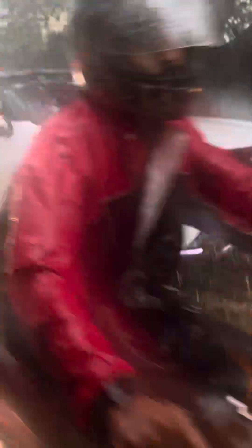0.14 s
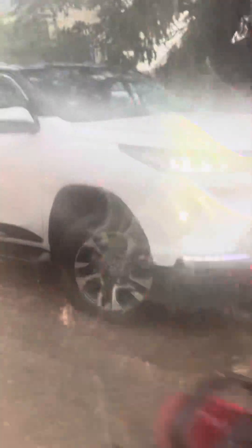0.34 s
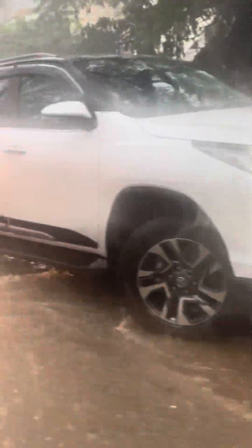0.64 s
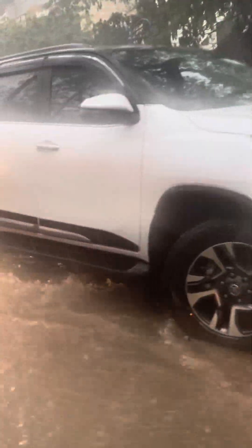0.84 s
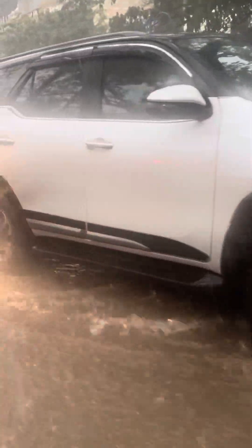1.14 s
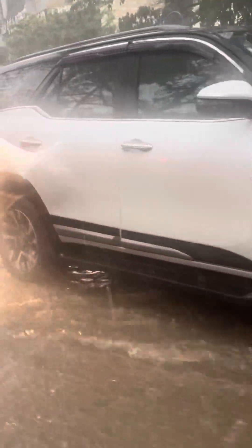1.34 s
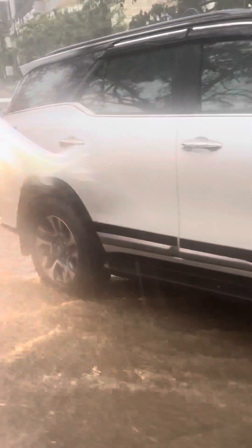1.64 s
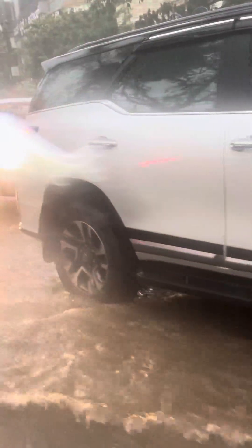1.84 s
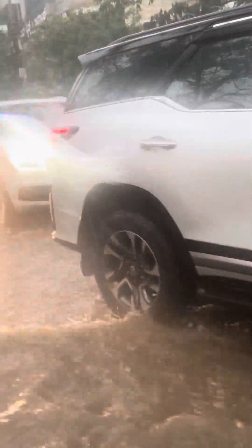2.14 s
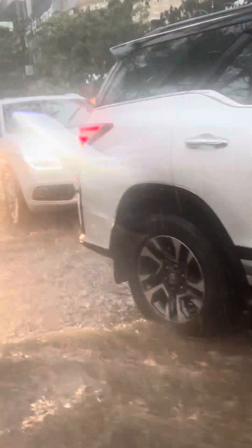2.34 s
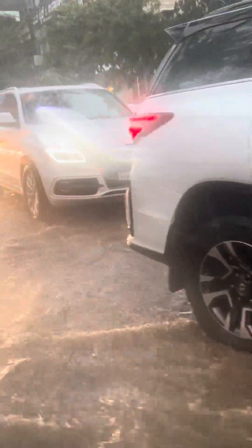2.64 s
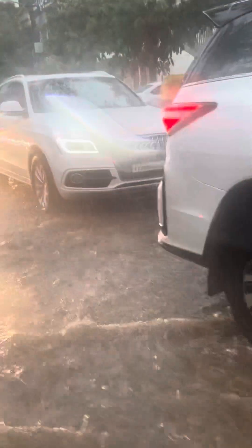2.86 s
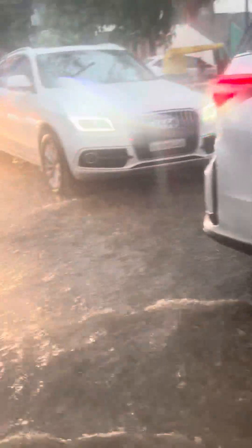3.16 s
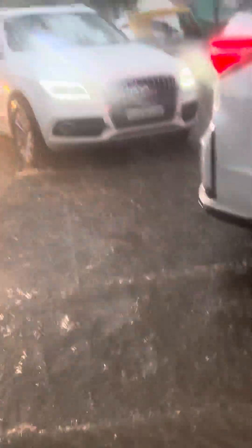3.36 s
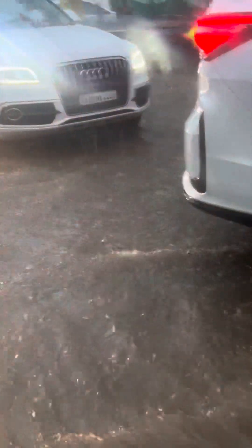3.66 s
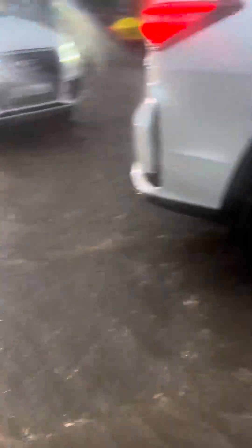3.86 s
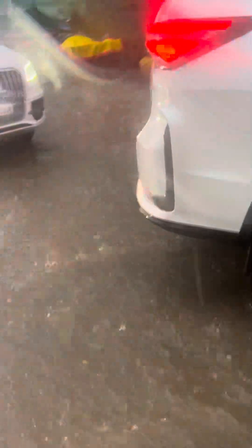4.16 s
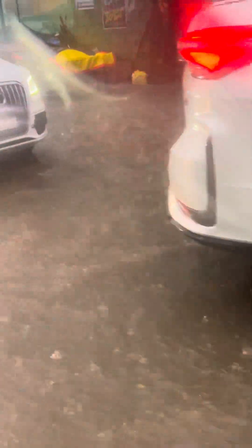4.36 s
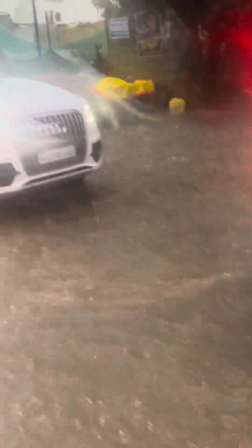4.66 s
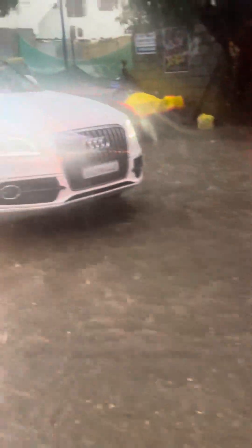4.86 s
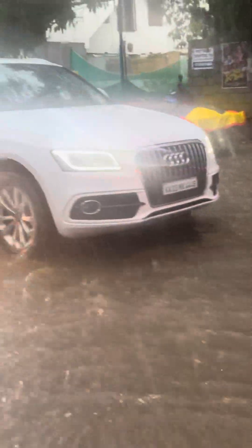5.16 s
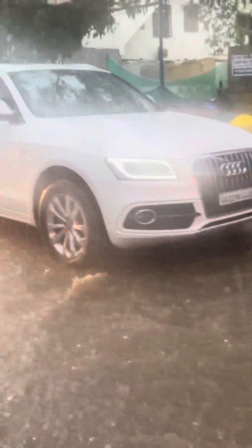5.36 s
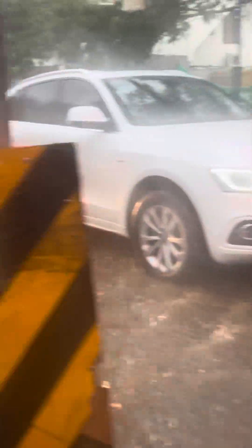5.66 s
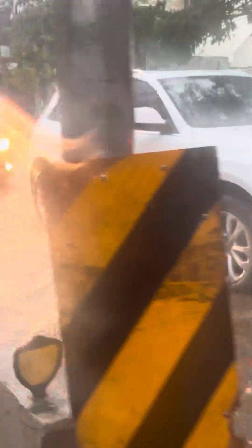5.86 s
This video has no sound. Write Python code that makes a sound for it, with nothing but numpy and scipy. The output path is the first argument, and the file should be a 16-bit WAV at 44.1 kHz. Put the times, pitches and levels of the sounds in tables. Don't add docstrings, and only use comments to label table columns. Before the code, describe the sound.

Heavy rain on a flooded street heard from inside a slow vehicle, engine throbbing, drops cracking on panels, a near horn blaring late.

```python
import sys
import numpy as np
from scipy import signal
from scipy.fft import irfft
from scipy.io import wavfile
from scipy.ndimage import uniform_filter1d

SR = 44100
rng = np.random.default_rng(int(sys.argv[2]) if len(sys.argv) > 2 else 0)


def wav_record(signal):
    frames = np.transpose(np.atleast_2d(signal))
    bounded = np.clip(frames, -1, 1)
    quanta = np.round(bounded * 32767).astype(np.int16)
    wavfile.write(sys.argv[1], SR, quanta)


def convert_level_to_amplitude(level_db):
    exponent = np.asarray(level_db, float) / 20
    return 10 ** exponent


N = 264730
IDLE_HZ = 22.9
LEAD_IN_S = .003

# t/s, traffic nearness/dB, rain strength/dB
STREET = [(0.0, -4, 5), (.12, -6, 7), (.155, -5, 11), (.19, -5, 6), (.43, -2.5, 5.5), (.55, 2.5, 6.5),
          (.72, 4, 5.5), (1.14, 0, 2.5), (1.5, 0, 2), (1.9, 0, 1), (2.6, .5, 0.5), (3.1, 0, 0),
          (3.5, -1.5, 0), (4.2, 0, 0), (4.6, 2, 3), (5.1, 1.5, 4), (5.5, 1.5, 2.5), (6.0, 1, 2)]


def evened(x):
    return x / np.sqrt(np.mean(x ** 2) + 1e-20)


def read(points, hz):
    f, value = np.transpose(points)
    return np.interp(np.log(hz + 1), np.log(f + 1), value)


def columns(rows, t):
    s, *rest = np.transpose(rows)
    return [np.interp(t, s, c) for c in rest]


def add(mix, s, sound):
    part = mix[:, round(s * SR):][:, :sound.shape[1]]
    part += sound[:, :part.shape[1]]


def wander(size, hz):
    rate, turn = rng.uniform(-1, 1, (2, 12, 1))
    t = np.arange(0, size + 128, 64) / SR
    coarse = np.exp(2j * np.pi * (rate * hz * t + turn)).sum(0) / np.sqrt(12)
    return np.interp(np.arange(size) / 64, np.arange(len(coarse)), coarse)


def ports(hz):
    # f/Hz, left-right/dB
    lean = [(60, -1.5), (96, 3), (150, -1), (250, 5), (400, 4), (640, 10), (1020, 3.5), (1630, 0),
            (2620, 0.5), (4200, -0.5)]
    # f/Hz, left lead/rad
    lead = [(60, .03), (200, 0.29), (600, 1.7), (900, 5), (1800, 6.3), (2400, 9.16), (3400, 6.6),
            (4400, 8.36), (8000, 7.44)]
    left = convert_level_to_amplitude(read(lean, hz) / 2) * np.exp(1j * read(lead, hz))
    return np.array([left, 1 / abs(left)])


def street():
    # f/Hz, density/dB
    rumble = [(15, -31.5), (25, -6), (49, 0), (81, -5), (120, -3.5), (173, -15), (313, -12), (399, -25.5),
              (450, -26), (580, -51.5), (990, -120)]
    water = [(210, -34), (350, -7.5), (584, -4), (632, 0.5), (680, -2.5), (821, -1), (883, 2), (960, 4),
             (1060, -1.5), (1340, -8), (1500, -6.5), (1950, -38.5), (3300, -120)]
    patter = [(790, -44.5), (1350, -3), (1460, -12), (1790, -4.5), (2030, -10.5), (2500, -15.5),
              (2800, -21.5), (3640, -60), (6160, -120)]
    fizz = [(1500, -37), (2500, -5), (3100, -0.5), (3900, -4), (4700, -7.5), (5150, -16), (5330, -32),
            (5750, -30), (6000, -18), (8000, -21.5), (8500, -28.5), (9600, -31), (9850, -70.5),
            (14000, -88)]
    # f/Hz, density/dB
    air = [(10800, -40.5), (11100, -2), (13000, -0.5), (13300, -12)]
    # from/s, to/s
    air_off_s = (.63, 1.74)
    # f/Hz, left-right likeness/1
    likeness = [(60, 1), (110, 0.9), (200, 0.68), (370, 0.63), (680, 0.089), (1250, 0.18), (2300, 0.69),
                (4200, 0.43), (7000, 1), (9000, 0.54)]
    # level/dB, traffic share/1, rain share/1
    beds = [
        (-33.5, 0.92, -0.088),
        (-38, 0.88, 0.045),
        (-55, -0.079, 1.15),
        (-68, 0.11, 1.04),
    ]

    frames, hz = N // 128 + 5, np.fft.rfftfreq(512, 1 / SR)
    t = np.arange(frames) * 128 / SR
    a, b, c, d, patches = rng.standard_normal((frames, 257, 5)).T
    patches = evened(uniform_filter1d(uniform_filter1d(patches, size=7, axis=0), size=16, axis=1))
    flicker = evened(uniform_filter1d(rng.standard_normal((frames, 257)).T, size=60, axis=0))

    power = 0
    traffic_db, rain_db = columns(STREET, t)
    shapes, widths_db = (rumble, water, patter, fizz), (2.6, 4.88, 7.35, 8.5)
    for shape, width_db, (db, cars, wet) in zip(shapes, widths_db, beds):
        level_db = db + cars * traffic_db + wet * rain_db
        gain = convert_level_to_amplitude(read(shape, hz))
        power = power + (gain[:, None] / np.linalg.norm(gain) * convert_level_to_amplitude(level_db + width_db)) ** 2
    hushed = (t > air_off_s[0]) & (t < air_off_s[1])
    power = power + convert_level_to_amplitude(read(air, hz)[:, None] - 104 - 40 * hushed) ** 2

    same = np.clip(read(likeness, hz), -1, 1)[:, None]
    left = a + 1j * b
    z = np.array([left, same * left + np.sqrt(1 - same ** 2) * (c + 1j * d)])
    z *= ports(hz)[:, :, None] * np.sqrt(power) * convert_level_to_amplitude(1.35 * patches + 1.43 * flicker + 1.5)
    return signal.istft(z, nperseg=512, noverlap=384)[1][:, :N]


def bending(treble_db, spread_s, size=2048):
    # f/Hz, density/dB
    panel = [(120, -39.5), (280, -2), (420, -0.5), (900, -0.5), (1480, -1.5), (1980, -8.5), (2800, -25),
             (4200, -47), (5500, -68), (7000, -64), (9200, -71.5), (10500, -85.5), (16000, -96)]
    # f/Hz, left lead/rad
    panel_lead = [(900, .05), (1400, 0.53), (2100, 1.82), (3200, 2), (5000, .3)]
    hz = np.fft.rfftfreq(size, 1 / SR)
    gain = convert_level_to_amplitude(read(panel, hz) + treble_db * np.clip(np.log2(hz / 1500 + 1e-9), 0, 1))
    pair = np.exp(.5j * read(panel_lead, hz) * np.array([[1], [-1]]))
    travel_rad = 4 * np.pi * spread_s * np.sqrt(1000 * hz) + 2 * np.pi * hz * LEAD_IN_S
    pulse = irfft(gain * pair * np.exp(-1j * travel_rad - 2.8j))
    pulse = pulse * signal.windows.tukey(size, .06)
    return pulse / abs(pulse).max()


def drops():
    lands = rng.random(N) < 400.0 / SR
    size = convert_level_to_amplitude(3.1 * np.minimum(rng.exponential(1, N), 4)) * lands
    patch, out = rng.integers(0, 6, N), np.zeros((2, N))
    for k in range(6):
        side = convert_level_to_amplitude([[3.0], [-3.0]]) ** (-1) ** k
        tick = bending(2.7 + 2.5 * (k // 2), rng.uniform(.0008, 0.002996)) * side
        out += signal.oaconvolve((size * (patch == k))[None], tick, axes=1)[:, :N]
    rain_db = columns(STREET, np.arange(N) / SR)[1]
    return convert_level_to_amplitude(rain_db - 49.5) * evened(out)


def throb(turns, orders):
    out = np.zeros((2, N))
    for k, db in orders:
        lag_rad = .9 * k ** 2
        tone = convert_level_to_amplitude(db) * np.exp(2j * np.pi * k * turns + 1j * lag_rad) * (1 + 0.42 * wander(N, 5.0))
        out += np.sqrt(2) * (ports(k * IDLE_HZ)[:, None] * tone).real
    return out


def neighbour_engine():
    # t/s, level/dB
    nearness = [
        (.6, -61),
        (.9, -44),
        (1.4, -39),
        (1.9, -38),
        (2.1, -34.5),
        (2.4, -31.5),
        (2.55, -66),
    ]
    # order/1, level/dB
    idle_orders = [(2, 1), (3, 5), (5, -4), (6, -13.5)]
    t = np.arange(N) / SR
    level_db = columns(nearness, t)[0]
    return throb(IDLE_HZ * t, [(k, level_db + db) for k, db in idle_orders])


def own_engine():
    # t/s, firing rate f/Hz, load/dB, strain/dB per order
    course = [(0.0, 17.6, -20, 4), (.25, 17.7, 2, 5.5), (.6, 14.9, -9, 2.5), (.95, 17.6, 0.5, 9.5),
              (1.25, 18.9, -8.5, 6.5), (1.7, 20.5, -3, 7), (2.2, 22.6, 2, 2), (2.55, 23.4, -2, 4),
              (2.72, 23.4, -3, 3), (2.79, 23.3, 5, -4.5), (3.2, 20.8, -0.5, -2.5), (3.6, 20.9, -1, 1.5),
              (4.0, 21.4, -2, -1.5), (4.4, 22.6, -1, -2.5), (5.0, 24.3, -1, 0.5), (5.4, 25.7, -5, -4.5),
              (5.7, 24.4, -4, -2), (6.0, 23, 4.5, -1.5)]
    # order/1, level at middle load/dB
    low_orders = [(2, -39), (3, -30), (4, -32.5), (5, -34)]
    # f/Hz, level/dB
    boom = [(80, -27.5), (100, -31), (115, -40.5), (140, -49), (190, -49), (232, -43.5), (260, -51)]
    hz, load_db, strain_db = columns(course, np.arange(N) / SR)
    orders = [(k, db + load_db + strain_db * (k - 4)) for k, db in low_orders]
    orders += [(k, read(boom, k * hz) + 0.33 * load_db) for k in range(6, 11)]
    return throb(np.cumsum(hz) / SR, orders)


def thumps():
    # t/s, pitch f/Hz, peak level/dB, t60/s
    knocks = [
        (.545, 90, 2, 0.038),
        (0.911, 93, -7, 0.14),
        (.968, 109, -11, 0.073),
        (.998, 299, -16, 0.045),
        (1.005, 186, -8, 0.068),
        (2.887, 325.5, -18, .09),
        (4.79, 247, -16.5, 0.054),
        (5.476, 73.3, -0.5, 0.084),
    ]
    out, t = np.zeros((2, N)), np.arange(6000) / SR
    for s, hz, db, t60 in knocks:
        knock = convert_level_to_amplitude(db - 60 * t / t60) * np.sin(2 * np.pi * hz * t) * np.minimum(t * hz, 1)
        add(out, s, knock * np.ones((2, 1)))
    return out


def cracks():
    # t/s, peak level/dB, treble/dB, left-right/dB
    hits = [(0.109, -29, 14, -1), (0.16, -29, 14, 0.5), (0.2486, -21, 13.5, -1), (0.42, -33, 8, 6),
            (.588, -23, 9, 7), (.6858, -28, 8, 0), (0.7746, -28, 7, 0.5), (1.821, -27, 5, 6),
            (2.147, -33, 8, -1), (2.42, -33.5, 9, 3), (2.851, -26.5, 9, 0), (2.8824, -1.5, 7.5, -2.5),
            (3.0656, -32, 9, 0), (3.231, -32.5, 7.5, 1), (3.46, -30, 10, 4), (3.51, -29, 6.5, 0.5),
            (3.765, -28.5, 8, 0), (4.001, -21, -3, 2.5), (4.02, -26, 7, 0.5), (4.111, -28, 10.5, 2),
            (4.21, -29, 15.5, 2.5), (4.348, -26.5, 3, 4.5), (4.7885, -13.5, 10, -2), (5.3686, -30, 9, 0),
            (5.3813, -15.5, 13, -2), (5.4465, -26.5, 9, 2), (5.4685, -16, 8, -1.5), (5.628, -22.5, 1, 4),
            (5.7663, -31, 9, -1), (5.8155, -32.5, 8, 0)]
    out = np.zeros((2, N))
    for s, db, treble_db, pan_db in hits:
        blow = bending(treble_db, 0.002422)
        dull = uniform_filter1d(blow, size=45)
        blow = blow + 0.66 * np.roll(dull, 170, axis=1) - 0.58 * np.roll(dull, 420, axis=1)
        side_db = np.array([[pan_db / 2], [-pan_db / 2]])
        add(out, s - .0008 - LEAD_IN_S, convert_level_to_amplitude(db + side_db) * blow)
    return out


def ticks():
    # t/s, level/dB
    hits = [
        (2.8832, -46),
        (5.3827, -42.5),
        (5.469, -32.5),
        (5.4698, -37),
    ]
    # f/Hz, density/dB
    glass = [(1500, -30), (2600, -7), (4000, 0.5), (5000, -3), (5600, -15), (6500, -8), (8000, -9),
             (9500, -22), (10300, -45), (11300, -28), (13500, -40)]
    out, hz = np.zeros((2, N)), np.fft.rfftfreq(512, 1 / SR)
    snap = np.roll(irfft(convert_level_to_amplitude(read(glass, hz))), 256) * np.hanning(512)
    for s, db in hits:
        add(out, s - 256 / SR, convert_level_to_amplitude(db + np.array([[3.0], [-3.0]])) * snap / abs(snap).max())
    return out


def blast(start, attack, hold, db, swell_db, release_db):
    t = np.arange(0, attack + hold + 0.3, 1 / SR)
    after = np.maximum(t - attack - hold, 0)
    fall_db = np.minimum(release_db * after, 11.5 + 108.5 * after)
    return start + t, db - 9 * np.maximum(1 - t / attack, 0) + swell_db * t - fall_db


def horn(shape, orders, sides, hz, sag, drift_hz):
    t, level_db = blast(*shape)
    turns = np.cumsum(hz * (1 - sag * np.exp(-(t - t[0]) / .025))) / SR
    at_hz, lean_db, lead = np.transpose(sides)
    out = np.zeros((2, len(t)))
    for k, gain, scatter in orders(t, level_db):
        paths = np.array([1 + scatter * wander(len(t), drift_hz * np.sqrt(k)) for port in range(2)])
        left = convert_level_to_amplitude(np.interp(k * hz, at_hz, lean_db)) * np.exp(1j * np.interp(k * hz, at_hz, lead))
        pair = np.array([[left], [1]]) * 2 / abs(left + 1)
        tone = gain * np.exp(2j * np.pi * (k * turns + rng.random())) * paths / np.sqrt(1 + scatter ** 2)
        out += np.sqrt(2) * (pair * tone).real
    return t[0], out * signal.windows.tukey(len(t), .02)


def far_orders(t, level_db):
    # order/1, level against the ring/dB
    plain_orders = [(1, 4), (2, 1), (10, -20.5), (14, -41), (19, -44), (20, -24), (21, -46), (22, -45)]
    # order/1, level/dB
    ring_orders = [(6, -11.5), (7, 1.5), (8, .5), (9, -16.5)]
    # order/1, t/s, level/dB
    shade = np.array([(6, .62, 4), (6, .76, 4.5), (6, 0.93, 2), (6, 0.99, -7), (6, 1.12, -3), (6, 1.22, 2),
                      (6, 1.31, 4), (6, 1.2, -4), (6, 1.46, 1), (6, 1.56, -8), (6, 1.62, 1.5),
                      (7, 0.52, -6), (7, 0.63, -4.5), (7, 0.88, -3), (7, 0.93, 4.5), (7, 0.98, -2),
                      (7, 1.1, 1.5), (7, 1.34, -2), (7, 1.44, 3), (7, 1.55, 1), (7, 1.63, -3), (8, .62, 4),
                      (8, 0.88, 0), (8, .94, -2), (8, 1.12, 2), (8, 1.11, -4.5), (8, 1.26, 2.5),
                      (8, 1.32, -4), (8, 1.45, 0), (8, 1.54, -7), (8, 1.61, 2.5), (9, .62, 5), (9, .94, 3),
                      (9, 0.91, -6), (9, 1.1, 3), (9, 1.34, -2), (9, 1.5, 1), (9, 1.8, 0)])
    # t/s, width/s, rise/dB per order above 7
    s, width, accent_db = (1.62, 0.023, 4.2)
    push_db = accent_db * np.exp(-((t - s) / width) ** 2)
    levels = [(k, level_db + db - 0.9) for k, db in plain_orders]
    for k, db in ring_orders:
        brighten_db = 3.5 * (k - 7.5) * (t - t.mean())
        shade_db = np.interp(t, *shade[shade[:, 0] == k, 1:].T)
        levels.append((k, level_db + db + brighten_db + push_db * max(k - 7, 0) + shade_db))
    return [(k, convert_level_to_amplitude(db), 1.2) for k, db in levels]


def near_orders(t, level_db):
    # order/1, level/dB
    high_orders = [(10, -41), (11, -43.5), (12, -53.5), (13, -58), (14, -51), (15, -51.5), (16, -57.5),
                   (17, -54), (18, -60), (19, -65.5), (20, -66.5), (21, -72)]
    # order/1, t/s, echo share/1, level of the swell that follows/dB
    nulls = [(1, 4.4, 0, -3), (1, 4.72, .05, 0), (1, 5.05, 0.11, -1), (1, 6.2, .1, 0), (2, 4.46, .2, -3),
             (2, 4.61, 0.24, -1), (2, 4.73, 0, -9.5), (2, 4.792, 0.5, 6), (2, 4.92, 0, -6.5),
             (2, 4.975, 0.8, -13), (2, 5.022, 0.3, -2.5), (2, 5.093, 0, 5), (2, 5.25, 0.3, 8),
             (2, 5.33, .5, 11), (3, 4.47, 0.1, 0), (3, 4.65, 0.53, 1), (3, 4.76, 0.1, -2),
             (3, 4.872, 0.6, 2), (3, 5.015, 0.47, -4), (3, 5.125, .8, -7), (3, 5.25, .7, 2.5),
             (3, 5.33, .5, 1), (4, 4.54, .5, -14), (4, 4.65, 0.2, -13.5), (4, 4.75, .85, -16.5),
             (4, 4.84, 0.4, -6), (4, 4.95, 0.8, -12.5), (4, 5.022, 0.8, -12), (4, 5.145, .3, -8.5),
             (4, 5.25, 0.5, -9.5), (4, 5.33, .5, -10), (5, 4.47, 0.6, -18.5), (5, 4.69, .9, -26),
             (5, 4.75, .5, -16.5), (5, 4.85, .85, -25), (5, 4.95, .2, -23), (5, 5.022, 0.8, -17),
             (5, 5.125, .55, -18.5), (5, 5.23, .4, -16), (5, 5.33, .5, -13), (6, 4.5, .5, -29.5),
             (6, 4.68, .5, -34.5), (6, 4.84, .8, -26), (6, 5.05, .5, -26.5), (6, 5.15, .3, -33),
             (6, 5.3, .5, -33),
             (7, 4.48, .3, -31), (7, 4.7, .4, -25), (7, 4.84, .7, -32), (7, 4.93, .4, -33),
                  (7, 5.04, .8, -27), (7, 5.3, .5, -30), (8, 4.48, .3, -30), (8, 4.6, 0.5, -28),
                  (8, 5.02, 0.3, -32.5), (8, 5.09, 0.6, -31), (8, 5.7, .5, -34.5), (8, 5.3, .5, -35),
                  (9, 4.48, .3, -34), (9, 4.62, .3, -31), (9, 4.845, 0.5, -32.5), (9, 5.0, .2, -34.5),
                  (9, 5.15, .6, -39.5), (9, 5.3, .5, -40)]
    levels, rows = [], np.array(nulls)
    for k in range(1, 10):
        s, share, db = rows[rows[:, 0] == k, 1:].T
        echo = np.interp(t, s, np.clip(share, 0, 1))
        turns = np.interp(t, s, np.arange(len(s)))
        beat = (1 - echo * np.exp(2j * np.pi * turns)) / (1 + echo)
        swell_db = np.interp(t, (s[1:] + s[:-1]) / 2, db[:-1])
        levels.append((k, convert_level_to_amplitude(level_db + swell_db) * beat, .1))
    top_db = level_db.max()
    high_db = top_db + 2.1 * (level_db - top_db) + 2.5
    return levels + [(k, convert_level_to_amplitude(high_db + db), .8) for k, db in high_orders]


def scene():
    # start t/s, attack/s, hold/s, level/dB, swell/dB per s, release/dB per s
    far = (.595, .03, 1.02, -51, 4, 280)
    near = (4.531, .024, .657, -21, -4, 280)
    # f/Hz, left-right/dB, left lead/rad
    far_sides = [(433, 7, 0.17), (2460, 0.5, 2.66), (3140, -4.5, 0.99), (3500, 3, 1.03), (9000, -1, .1)]
    near_sides = [(438, 8.5, 0.1), (877, 6, -1.3), (1300, 5.5, 0.86), (1770, -3.5, 1.5), (2192, 0, 4.5),
                  (2640, 3, 2.5), (3500, 1.5, 0.5), (9000, -1, -0.5)]
    out = street() + drops() + neighbour_engine() + own_engine() + thumps() + cracks() + ticks()
    add(out, *horn(far, far_orders, far_sides, hz=433.3, sag=.002, drift_hz=11.))
    add(out, *horn(near, near_orders, near_sides, hz=438.4, sag=.018, drift_hz=6.0))
    return out


def low_pass(x):
    return signal.sosfilt(signal.butter(12, 13700, fs=SR, output="sos"), x)


def record(dry):
    low_cut = signal.butter(3, 36.0, "high", fs=SR, output="sos")
    return low_pass(signal.sosfilt(low_cut, dry))


dry = scene()
out = record(dry)
wav_record(out)
```